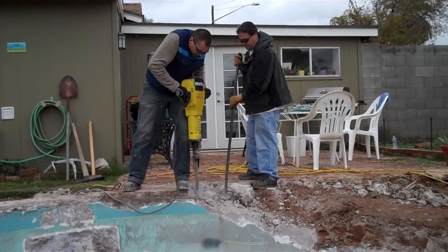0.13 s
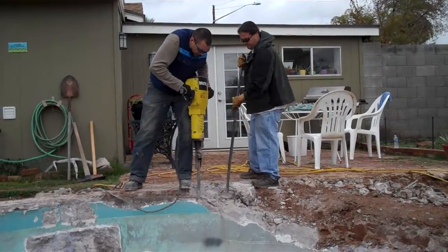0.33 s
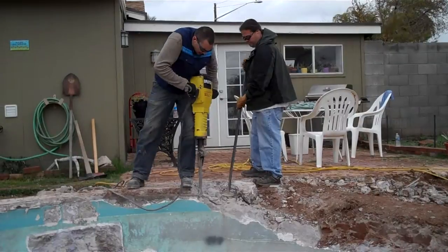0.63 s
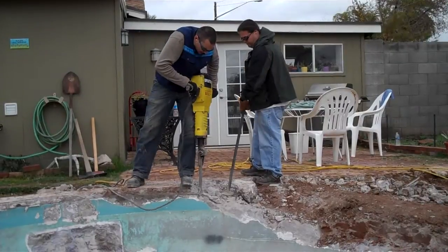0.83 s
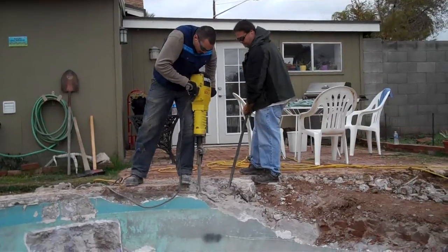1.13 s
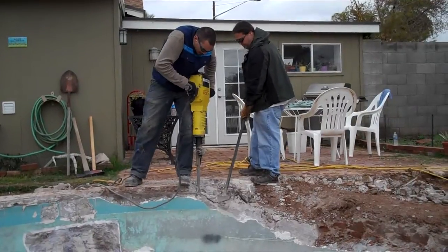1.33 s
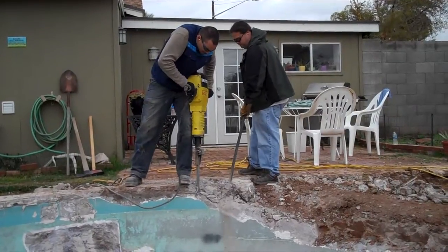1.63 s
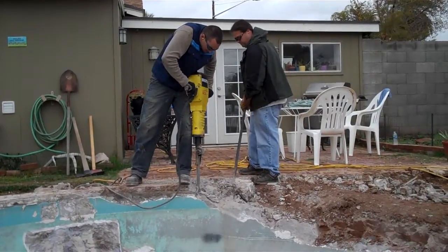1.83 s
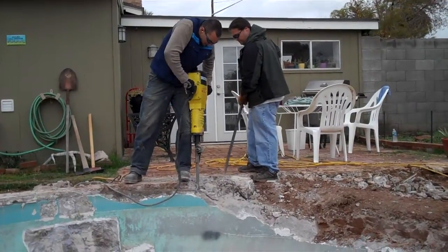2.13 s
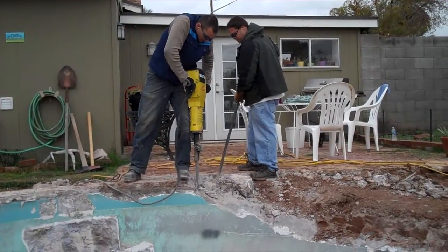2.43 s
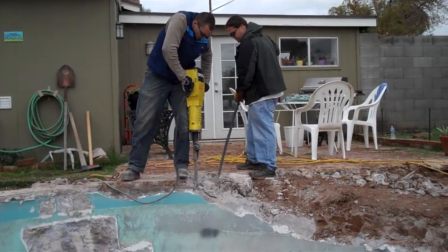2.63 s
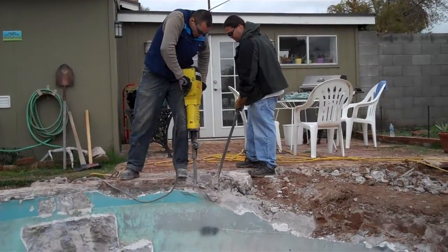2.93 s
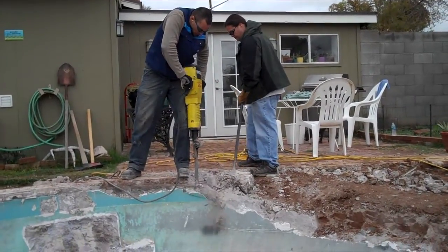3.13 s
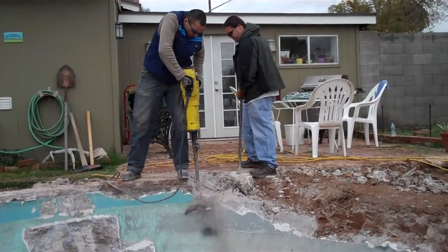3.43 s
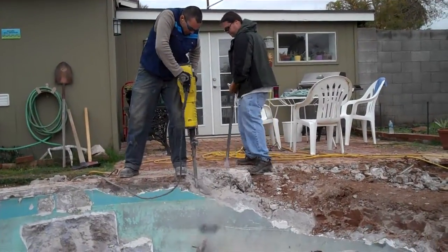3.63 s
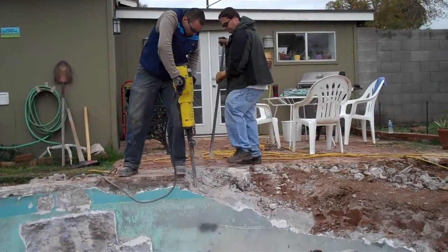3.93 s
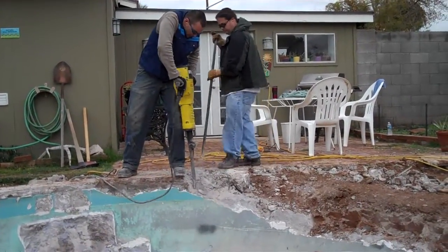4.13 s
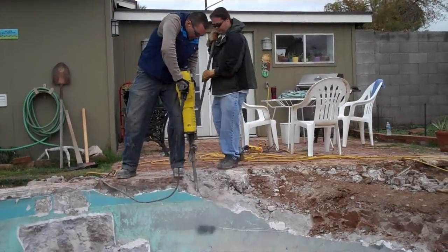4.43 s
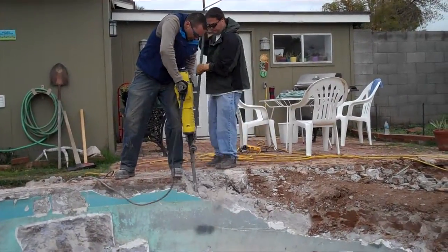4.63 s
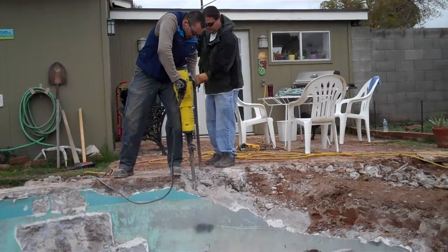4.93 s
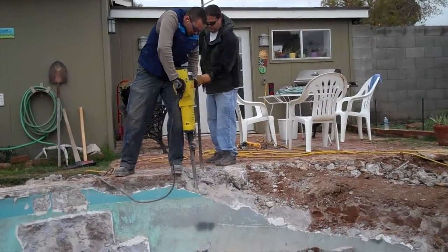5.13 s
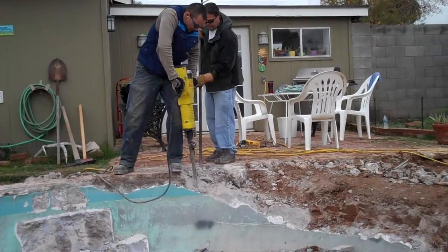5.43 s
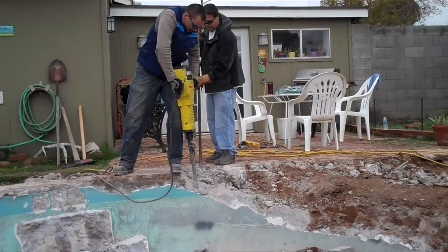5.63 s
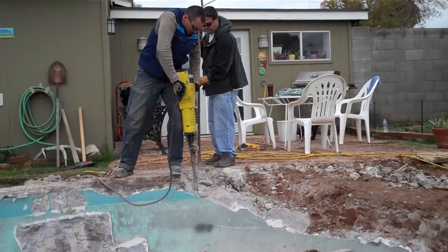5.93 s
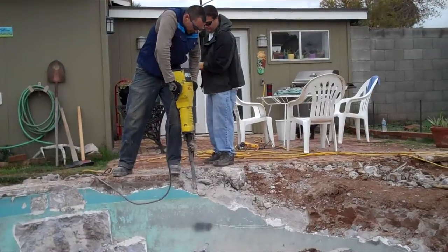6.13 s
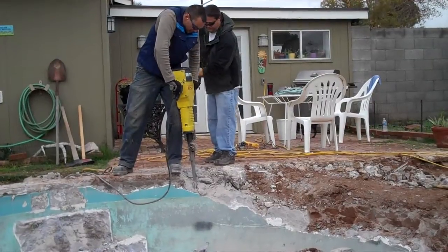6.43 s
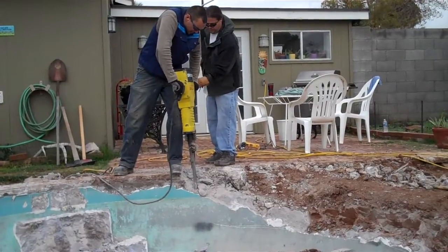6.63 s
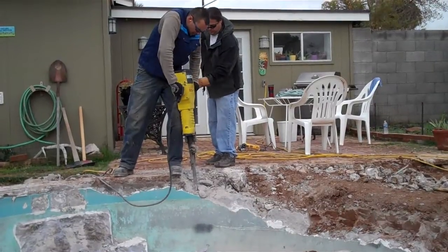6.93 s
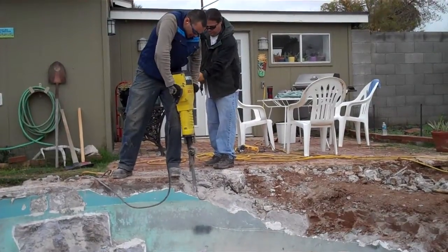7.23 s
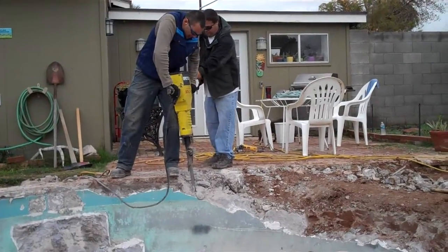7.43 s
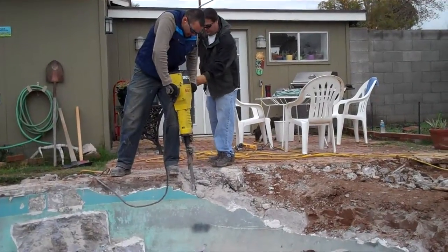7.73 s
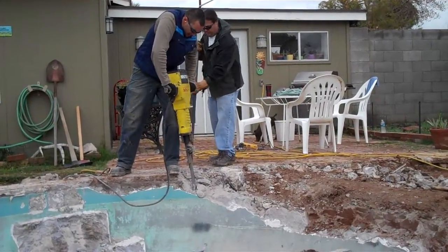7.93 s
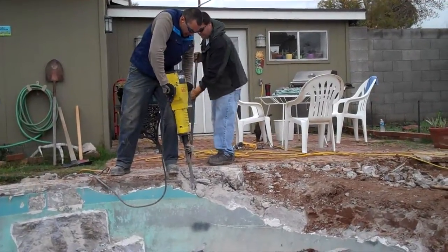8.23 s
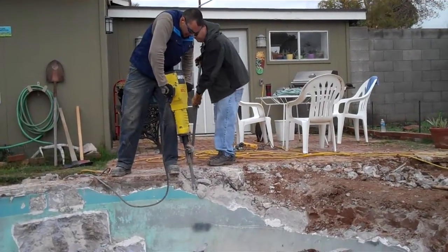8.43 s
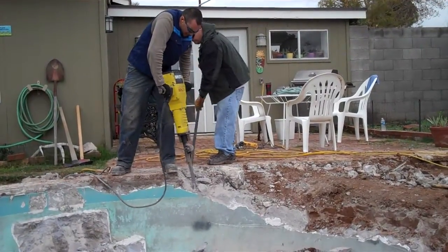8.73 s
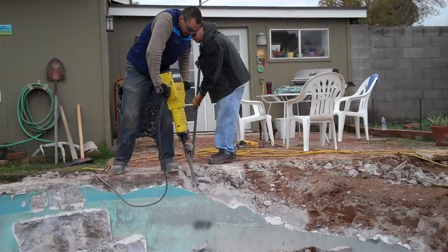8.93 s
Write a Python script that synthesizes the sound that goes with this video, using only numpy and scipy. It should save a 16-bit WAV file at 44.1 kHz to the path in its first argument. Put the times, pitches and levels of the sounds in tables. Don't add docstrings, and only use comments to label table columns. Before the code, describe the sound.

An electric breaker hammers concrete at about fifteen blows a second, each bright crack trailed by rattling chips and a metallic chisel ring, over motor hiss.

```python
import sys
import numpy as np
from scipy import signal
from scipy.fft import rfft, irfft, next_fast_len
from scipy.io import wavfile

SR = 44100
rng = np.random.default_rng(int(sys.argv[2]) if len(sys.argv) > 2 else 0)


def put_to_file(sound):
    columns = np.atleast_2d(sound).T
    safe = np.clip(columns, -1, 1)
    whole_steps = np.round(safe * 32767)
    wavfile.write(sys.argv[1], SR, whole_steps.astype(np.int16))


N = 399987


def from_db(db):
    return np.exp(np.asarray(db) * (np.log(10) / 20))


def at_hz(points, hz, column=1):
    points = np.array(points)
    return np.interp(np.log(np.maximum(hz, 1)), np.log(points[:, 0]), points[:, column])


def smooth_noise(white, rate_hz, step):
    r = np.exp(-2 * np.pi * rate_hz * step / SR)
    return signal.lfilter([1], [1, -2 * r, r * r], white)


def drift(rate_hz):
    slow = smooth_noise(rng.standard_normal(N // 40 + 502), rate_hz, 40)[500:]
    return np.interp(np.arange(N) / 40, np.arange(len(slow)), slow / slow.std())


def delayed(x, seconds):
    lag = int(seconds * SR)
    return np.concatenate([np.zeros(lag), x[:N - lag]])


# frequency in Hz, left minus right in dB,
# likeness of left and right (0 to 1), how far left leads in radians.
MICROPHONES = [(60, -17, .3, 2.5), (250, -3, .7, -0.5), (1000, -.5, .7, -0.5), (3000, -1, .7, -0.5),
               (4800, -1.5, .65, 0), (6000, -8, .55, 0), (6600, 1.5, .55, 1.4), (7500, 12, .5, 0),
               (9500, 7.5, .4, 1.6), (11300, 14, .3, -3), (12250, 1, .2, -10.5), (13000, 21, .1, 2),
               (15000, 19, .1, -5)]


def ports(hz):
    level = from_db(at_hz(MICROPHONES, hz) / 2)
    left = level * np.exp(.5j * at_hz(MICROPHONES, hz, column=3))
    return np.array([left, 1 / left]) * np.sqrt(2 / (level ** 2 + level ** -2))


def stereo_noise(spectrum):
    size = next_fast_len(N)
    hz = np.arange(size // 2 + 1) * SR / size
    shared, differing = rfft(rng.standard_normal((2, size)))
    alike = np.clip(at_hz(MICROPHONES, hz, column=2), 0, 1)
    both = np.sqrt(1 + alike) * shared + np.sqrt(1 - alike) * differing * [[1], [-1]]
    out = irfft(both * ports(hz) * from_db(at_hz(spectrum, hz)), size)[:, :N]
    return out / out.std()


PACE_MARKS = [-.017, .9561, 1.5865, 1.7141, 2.1059, 3.3339, 3.7327, 3.996, 4.3839, 4.583, 5.362, 5.8189,
              6.2696, 6.7759, 7.2952, 7.746, 7.9994, 9.0607]
BLOW_PERIOD_S = .0643


def blow_times():
    gaps = np.diff(PACE_MARKS, prepend=PACE_MARKS[0])
    numbers = np.cumsum(np.round(gaps / BLOW_PERIOD_S))
    return np.interp(np.arange(numbers[-1] + 1), numbers, PACE_MARKS)


def since_blow():
    t, starts = np.arange(N) / SR, blow_times()
    last = np.maximum(np.searchsorted(starts, t, side="right") - 1, 0)
    return last, t - starts[last]


# start in seconds, push into solid concrete in dB,
# rebound in free air in milliseconds, lowest chisel ring in dB.
WORK = [(0, -21, 33, -30), (.6, -22, 28, -31), (.8, -20, 24, -38), (1, -18, 24, -33), (1.5, -16, 19, -36),
        (2.6, -16, 17, -38), (2.95, -17, 25, -29), (3.25, -21, 30, -28), (3.8, -23, 32, -27),
        (4.2, -22, 22, -26), (4.6, -23, 31, -26), (5.2, -25, 26, -29), (5.6, -21, 23, -28),
        (6.4, -17, 16, -31), (7, -19, 16, -32), (8, -16, 15, -30), (8.5, -17, 18, -27),
        (9.07, -19, 21, -28)]
MEAN_PUSH_DB, MEAN_REBOUND_MS = -19, 22


def work_at(t):
    starts, *settings = np.transpose(WORK)
    return [np.interp(t, starts, setting) for setting in settings]


# frequency in Hz, level in dB per Hz.
MOTOR = [(24, -46), (40, -26), (247, -10.5), (838, -23), (2270, -5.5), (3140, -10), (6010, -2.5),
         (9890, -9.5), (11500, -29), (14200, -23), (14700, -60)]


def motor():
    return from_db(-33 + 1.5 * drift(20)) * stereo_noise(MOTOR)


# frequency in Hz, level in dB,
# time to fade by 60 dB in seconds, lead on the crack in seconds.
SLAB = [(130, -22, .03, .004), (300, -8.5, .0085, .0017), (520, -10.5, .012, .0012), (740, -18, .02, .0008),
        (980, -9.5, .014, .0007), (1300, -7.5, .008, .0009), (1790, -5.5, .005, .00078),
        (2380, -5.5, .005, .0006)]


def thud():
    hz, level_db, fade_s, lead_s = np.array(SLAB).T[..., None]
    early_s = .005
    t = np.maximum(np.arange(2000) / SR - early_s + lead_s, 0)
    loss, w = np.log(1000) / fade_s, 2 * np.pi * hz
    swell = np.sin(w * t) / w - t * np.cos(w * t)
    shapes = from_db(level_db) * np.e * swell * loss * np.exp(-loss * t)
    at = np.round((blow_times()[1:] - early_s) * SR).astype(int)
    push_db = work_at(at / SR)[0]
    luck = rng.standard_normal((len(at), len(SLAB)))
    pulses = from_db(push_db[:, None] + 4 + .8 * luck) @ shapes
    out = np.zeros(N + 2000)
    for start, pulse in zip(at, pulses):
        out[start:start + len(pulse)] += pulse
    ground_echo = from_db(-10) * delayed(out[:N], .00192)
    low_cut = signal.butter(2, 70, "high", fs=SR, output="sos")
    return signal.sosfilt(low_cut, ground_echo - out[:N]) * from_db([[-.6], [.6]])


# frequency in Hz, level in dB per Hz.
CRACK = [(2500, -7), (3500, -10), (4500, 0), (6000, 2), (7300, 1.5), (9000, -10.5), (11500, -19),
         (14000, -19), (16300, -38)]


def crack(last, age, push_db):
    luck = rng.standard_normal(last[-1] + 1)
    level_db = -9.8 + .55 * (push_db - MEAN_PUSH_DB) + 1.5 * luck[last]
    fade_s = .02
    return from_db(level_db - 60 * age / fade_s) * stereo_noise(CRACK)


# frequency in Hz, level in dB per Hz.
RATTLE = [(60, -26), (120, -9), (450, -4.5), (1000, -6), (2400, -4), (3300, -4), (4500, 0.5), (6000, -0.5),
          (7500, 2), (9000, -9), (11500, -17), (14300, -17), (14700, -55)]


def rattle(last, age, push_db):
    swell_s, half_length_s, extra_db = 2.98, .22, 4
    t = np.arange(N) / SR
    swell_db = extra_db * np.exp(-((t - swell_s) / half_length_s) ** 2)
    luck = rng.standard_normal(last[-1] + 1)
    grains_db = 2.5 * drift(120) + 1.5 * luck[last]
    level_db = -16 + .12 * (push_db - MEAN_PUSH_DB) + swell_db + grains_db
    fade_s = .12
    return from_db(level_db - 60 * age / fade_s) * stereo_noise(RATTLE)


# time in seconds, lowest ring in dB,
# main pair of tones in dB, rebound in milliseconds.
SINGING = [(.113, -23.5, -12.5, 39), (.306, -19.5, -14.5, 30), (.697, -30, -14, 31), (.956, -28, -16, 24),
           (1.779, -26, -16, 17), (2.041, -35, -16, 18), (2.3, -30, -16, 22), (2.752, -26, -15.5, 16),
           (3.269, -28, -16.5, 45), (3.334, -16.5, -16.5, 27), (3.599, -24, -12.5, 44),
           (3.733, -24, -11, 38), (4.06, -21.5, -14, 22), (4.451, -26, -18, 41), (4.516, -16, -16, 27),
           (4.714, -31, -11, 30), (4.908, -29, -12.5, 29), (4.972, -17, -17, 32), (5.427, -21, -18, 24),
           (5.492, -27, -14.5, 22), (5.689, -26, -15.5, 20), (6.077, -24, -18.5, 22), (6.333, -28, -16, 15),
           (6.712, -26, -19, 16), (7.1, -25, -20, 17), (7.553, -29, -16, 15), (7.873, -28, -15.5, 18),
           (8.249, -21.5, -21, 14), (8.498, -22, -17.5, 15), (8.749, -14.5, -20, 17)]
DEAD = [.762, .827, 1.272, 1.844, 2.429, 2.623, 4.255, 5.753, 5.819, 6.141, 6.649, 6.776, 6.905, 7.035]


def ringing():
    starts = blow_times()
    _, rebound_ms, low_db = work_at(starts)
    luck = rng.standard_normal((len(starts), 3))
    pair_db = -19 + .22 * (rebound_ms - MEAN_REBOUND_MS)
    rows = np.transpose([starts, low_db + 2.2 * luck[:, 0], pair_db + 1.3 * luck[:, 1],
                         rebound_ms * from_db(.8 * luck[:, 2])])
    for s, *special in SINGING:
        rows[abs(starts - s).argmin(), 1:] = special
    rows[[abs(starts - s).argmin() for s in DEAD], 1:3] -= 6
    return rows


# frequency in Hz, level in dB,
# group (1 lowest ring, 2 main pair, 3 other tones).
CHISEL = [(4188, 3.5, 1), (4772, 4.6, 3), (4815, -4, 3), (5404, -14.5, 2), (6000, -2.5, 2), (6060, -11, 2),
          (6128, -.5, 2), (6205, -11, 2), (7482, -1.5, 3), (7667, -3, 3), (8033, -.5, 3), (8385, 1.5, 3),
          (9682, 0.5, 3), (10276, -6.5, 3), (10896, -7, 3), (12680, -14, 3), (13597, -13, 3),
          (14155, -5.5, 3)]


def chisel(last, age):
    free_fade_s, landed_fade_s = .42, .06
    blows, step, steps = ringing(), 16, 200
    upper_db = -23.5 + .1 * (work_at(blows[:, :1])[1] - MEAN_REBOUND_MS)
    coarse, fine = np.arange(steps) * step / SR, np.arange(steps * step) / SR
    shape = (len(blows), len(CHISEL))
    luck = rng.standard_normal((*shape, 4, 1))
    turn = rng.uniform(0, 2 * np.pi, (*shape, 1))
    jolts = smooth_noise(rng.standard_normal((*shape, 2, steps + 40)), 40, step)[..., 40:]
    jolts = jolts / jolts.std()
    swell = 1 - .8 * np.exp(-coarse / .003)
    rings = np.zeros((2, len(blows), steps * step), np.float32)
    for k, (hz, level_db, group) in enumerate(CHISEL):
        free_s = blows[:, 3:] / 1000 * 1.1 * from_db(1.5 * luck[:, k, 0])
        landed_s = np.maximum(coarse - free_s, 0)
        decay_db = -60 * (coarse / free_fade_s + landed_s / landed_fade_s)
        if group < 3:
            struck_db = blows[:, [int(group)]] + 1.5 * luck[:, k, 1] + 4
        else:
            struck_db = upper_db + 3.3 * luck[:, k, 1] - 3
        gain = from_db(level_db + struck_db + decay_db + 2.0 * jolts[:, k, 0]) * swell
        wander = np.float32(turn[:, k] + .95 * jolts[:, k, 1])
        phase = np.float32(2 * np.pi * (hz + 11.0 * luck[:, k, 2]) * fine)
        phase = phase + np.repeat(wander, step, axis=1)
        spread = 1.2 * (1 - at_hz(MICROPHONES, hz, column=2)) * luck[:, k, 3]
        for side, (port, lead) in enumerate(zip(ports(hz), (spread, -spread))):
            wave = np.sin(phase + np.float32(np.angle(port) + lead))
            rings[side] += np.repeat(np.float32(gain * abs(port)), step, axis=1) * wave
    return rings[:, last, np.clip(age * SR, 0, len(fine) - 1).astype(int)]


# delay to the left in seconds, delay to the right in seconds,
# level in dB.
ECHOES = [
    (.0113, .0127, -19.5),
    (.0172, .0159, -26),
    (.0284, .0263, -22.5),
    (.0365, .0381, -19),
    (.051, .047, -19.5),
]


def yard(x):
    dull = signal.sosfilt(signal.butter(1, 7000, fs=SR, output="sos"), x)
    out = np.zeros((2, N))
    for left_s, right_s, db in ECHOES:
        out += from_db(db) * np.array([delayed(dull[0], left_s), delayed(dull[1], right_s)])
    return out


def scene():
    hiss = motor()
    push_db = work_at(np.arange(N) / SR)[0]
    last, age = since_blow()
    breaker = thud() + crack(last, age, push_db) + rattle(last, age, push_db) + chisel(last, age)
    return hiss + breaker + yard(breaker)


# start in seconds, level in dB,
# length in milliseconds.
BOTTOMING = [(.176, -20, 5), (.184, -17, 5), (.438, -11, 5), (.72, -19, 5), (3.336, -13, 6),
             (3.465, -17, 4), (3.533, -13, 5), (3.733, -22, 6), (3.868, -17, 5), (4.067, -19, 6),
             (4.19, -18, 4), (4.384, -7, 1.8), (4.388, -11, 1.8), (4.452, -20, 5), (4.516, -18, 4),
             (4.589, -19, 4), (4.65, -18, 4), (4.657, -18, 4), (4.72, -16, 5), (4.733, -18, 6),
             (4.743, -19, 4), (4.795, -21, 5), (4.866, -19, 4), (4.926, -15, 7), (5.038, -21, 5),
             (5.102, -20, 4), (8.625, -19, 6)]


def bottoming():
    out = np.zeros(N)
    for s, level_db, ms in BOTTOMING:
        hump = from_db(level_db) * np.hanning(int(ms * 1.6 * SR / 1000))
        start = int(s * SR)
        out[start:start + len(hump)] += hump
    return out


def low_pass(x):
    return signal.sosfilt(signal.butter(12, 16500, fs=SR, output="sos"), x)


def record(dry):
    left_limit, right_limit, cross_feed = .58, .46, .3
    left_cut = -1.2 * np.maximum(dry[0] - left_limit, 0)
    right_cut = 1.8 * np.maximum(-dry[1] - right_limit, 0)
    cut = np.array([left_cut, right_cut])
    bumps = signal.sosfilt(signal.butter(2, 1800, fs=SR, output="sos"), cut) + .08 * cut
    bumps[1] += 1.25 * bottoming()
    x = dry + bumps - cross_feed * bumps[::-1]
    x = signal.sosfilt(signal.butter(1, 11, "high", fs=SR, output="sos"), x)
    x = 1.02 * np.tanh(x / 1.02)
    mix = signal.sosfilt(signal.cheby2(14, 60, 16600, fs=SR, output="sos"), x)
    return low_pass(mix)


dry = scene()
out = record(dry)
put_to_file(out)
```